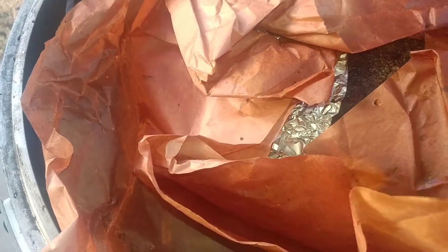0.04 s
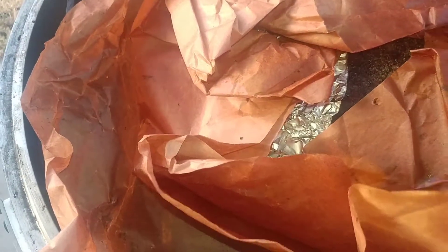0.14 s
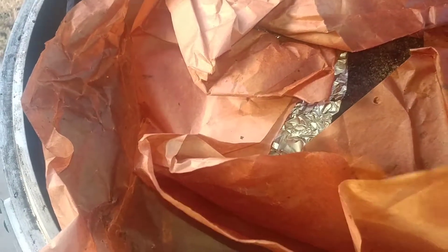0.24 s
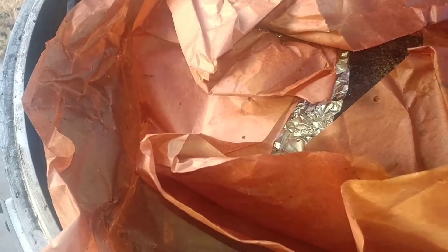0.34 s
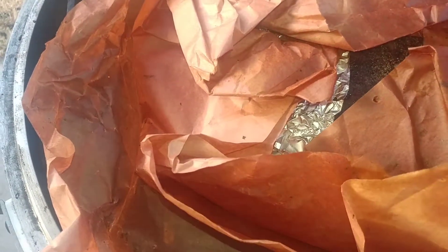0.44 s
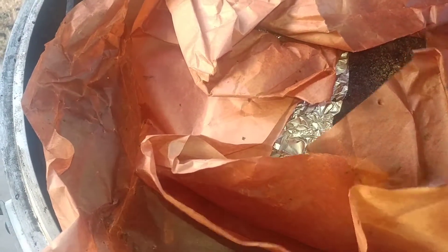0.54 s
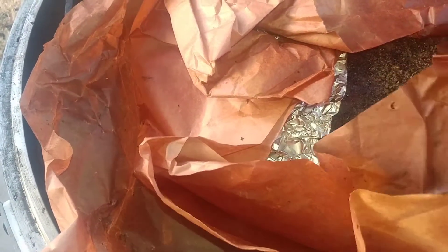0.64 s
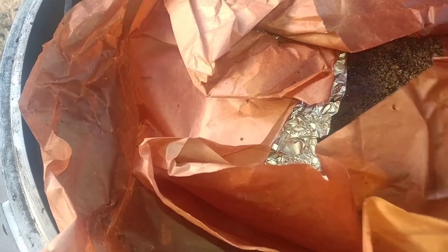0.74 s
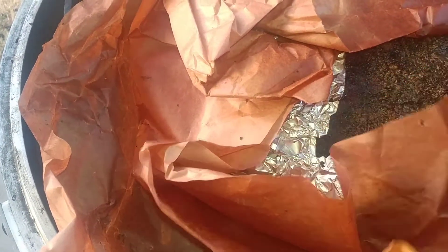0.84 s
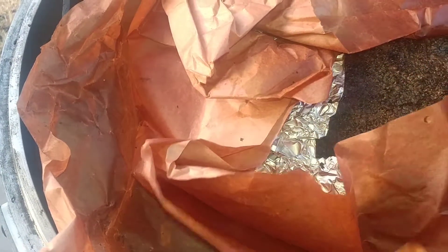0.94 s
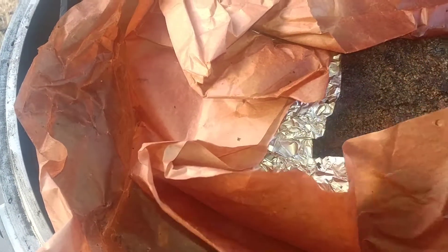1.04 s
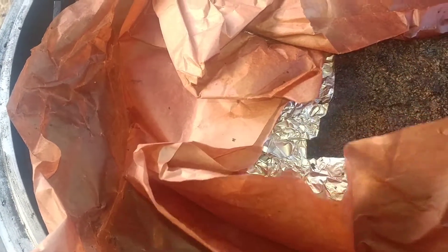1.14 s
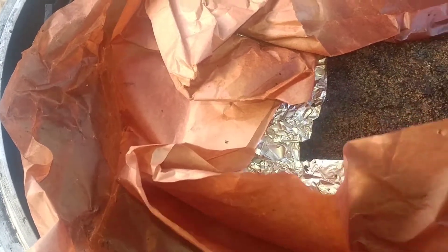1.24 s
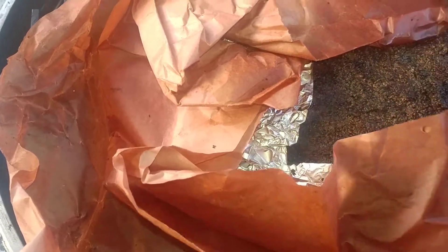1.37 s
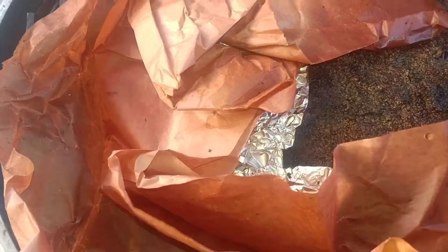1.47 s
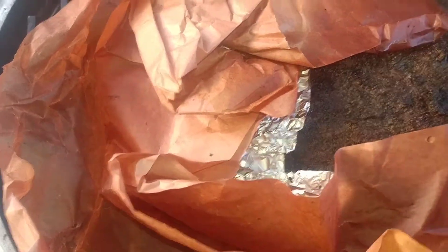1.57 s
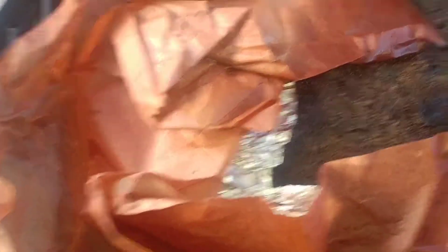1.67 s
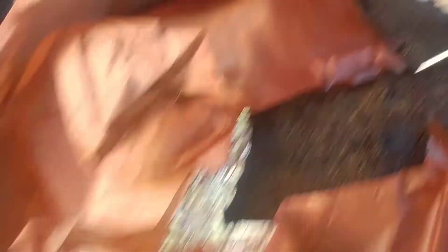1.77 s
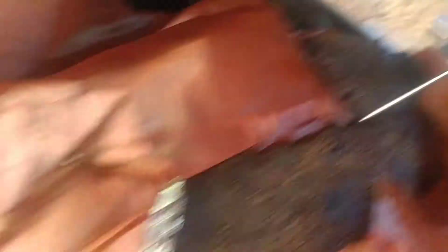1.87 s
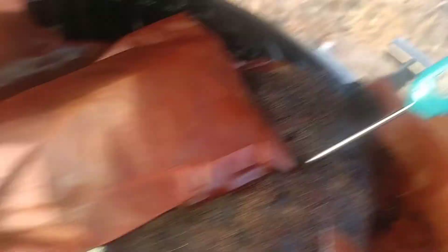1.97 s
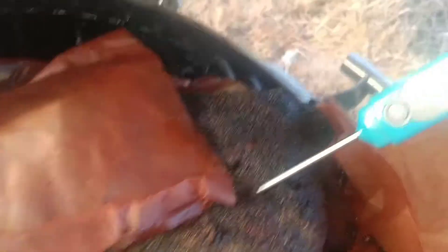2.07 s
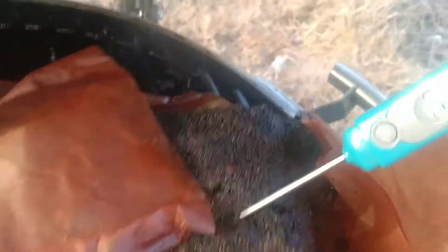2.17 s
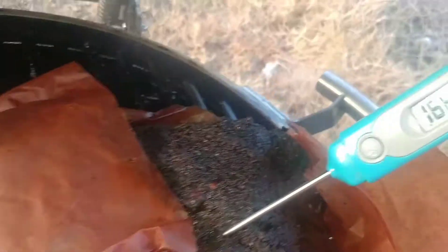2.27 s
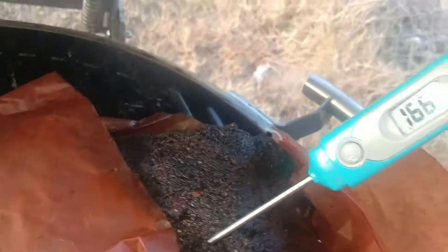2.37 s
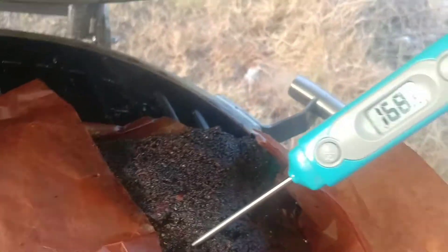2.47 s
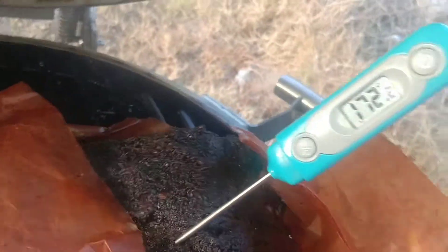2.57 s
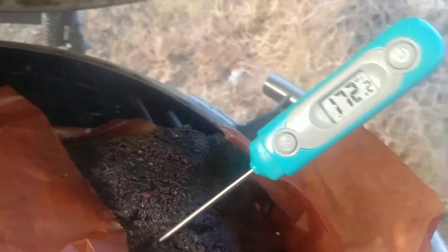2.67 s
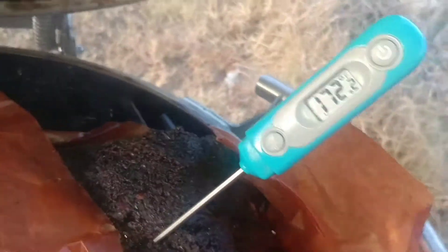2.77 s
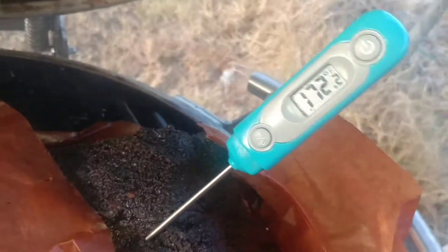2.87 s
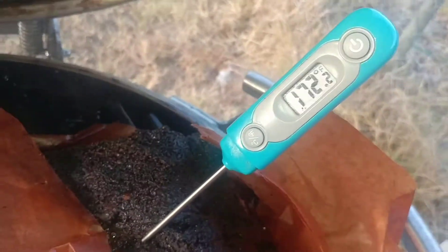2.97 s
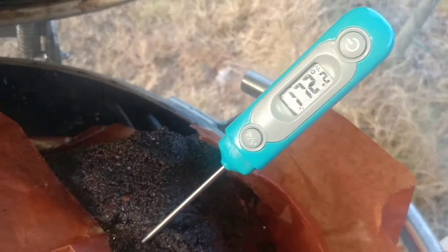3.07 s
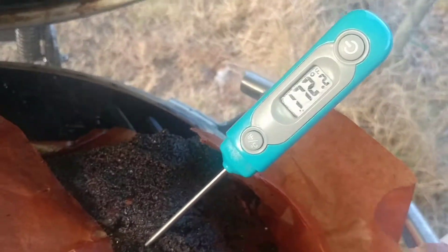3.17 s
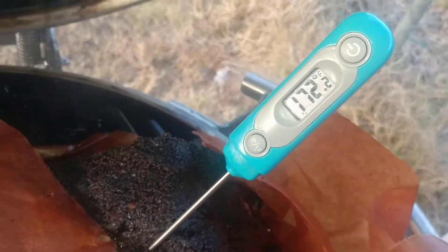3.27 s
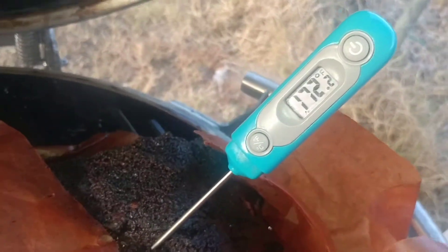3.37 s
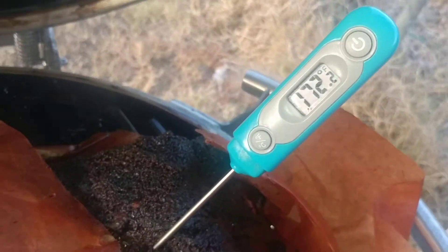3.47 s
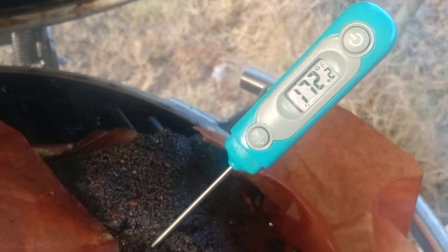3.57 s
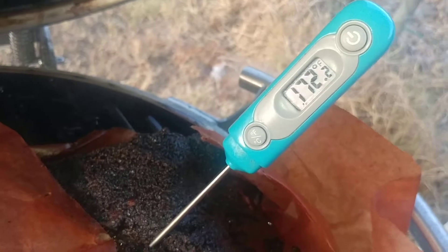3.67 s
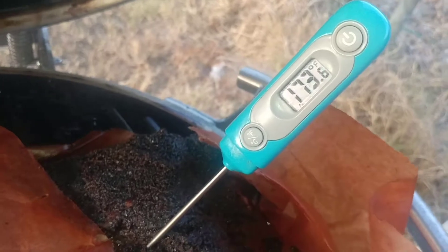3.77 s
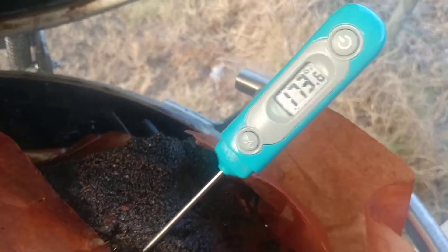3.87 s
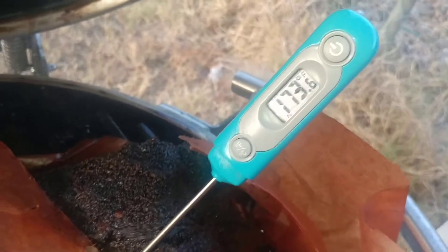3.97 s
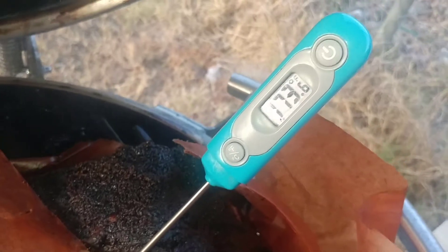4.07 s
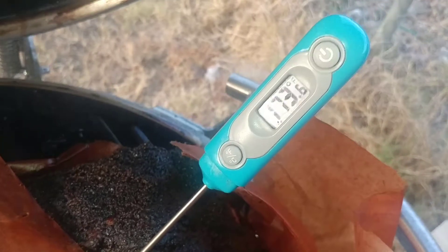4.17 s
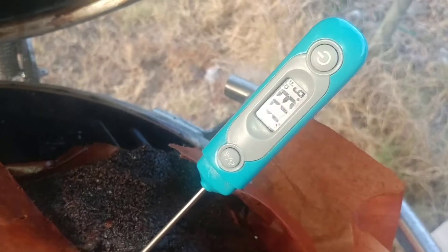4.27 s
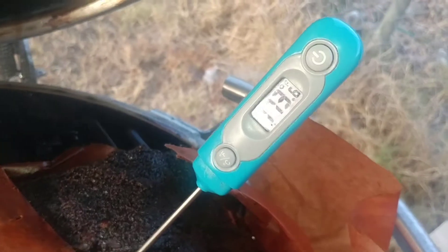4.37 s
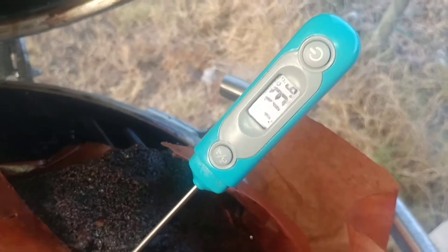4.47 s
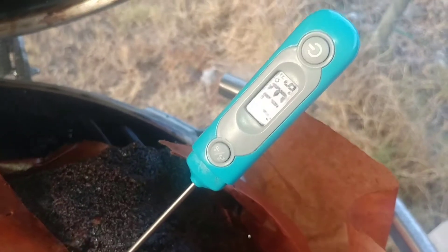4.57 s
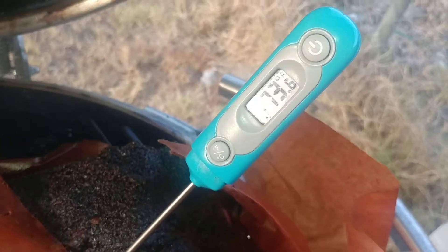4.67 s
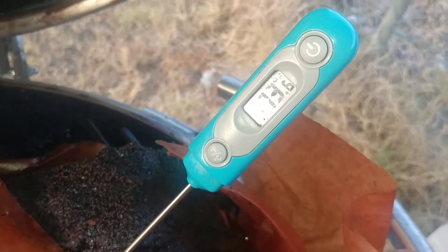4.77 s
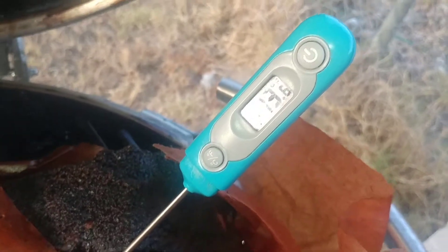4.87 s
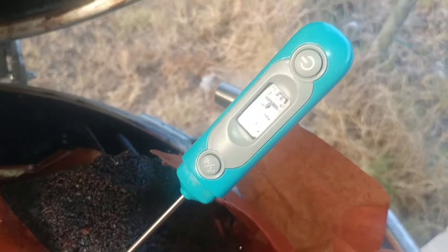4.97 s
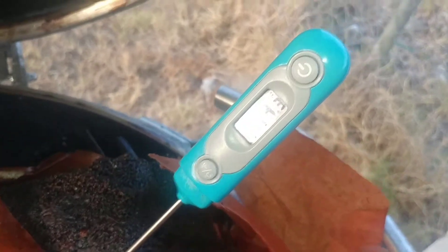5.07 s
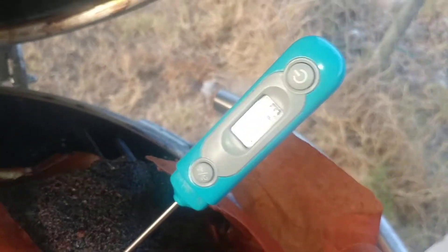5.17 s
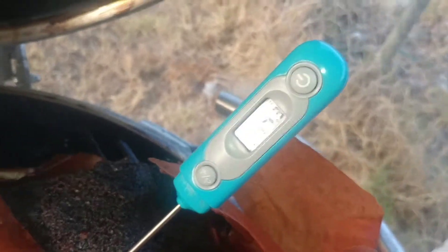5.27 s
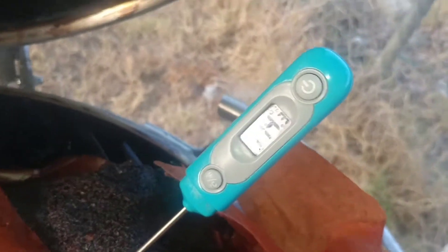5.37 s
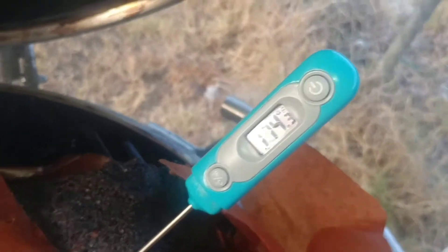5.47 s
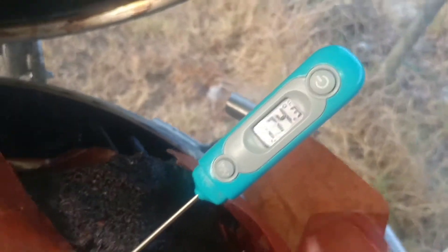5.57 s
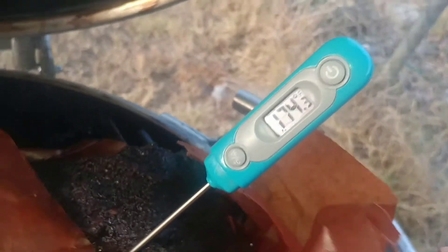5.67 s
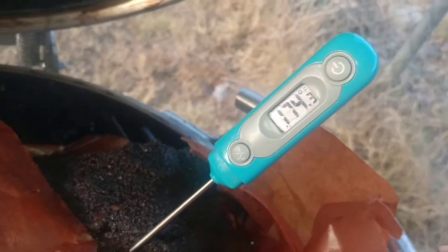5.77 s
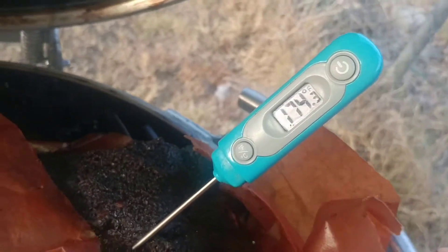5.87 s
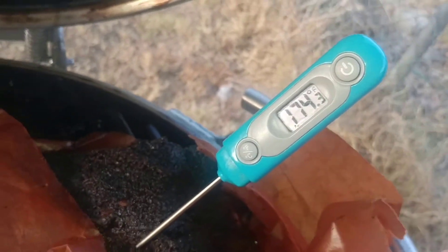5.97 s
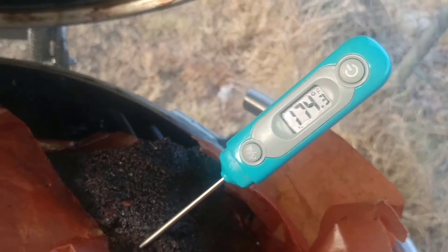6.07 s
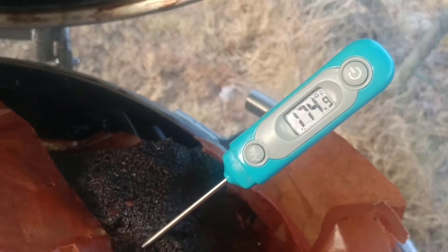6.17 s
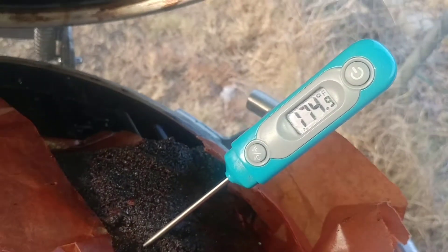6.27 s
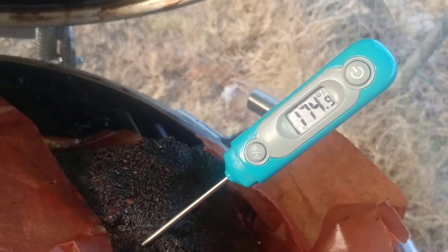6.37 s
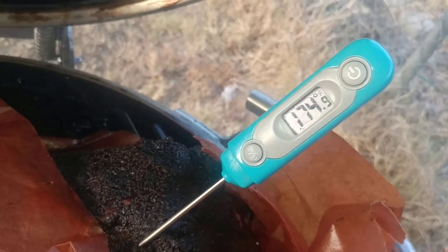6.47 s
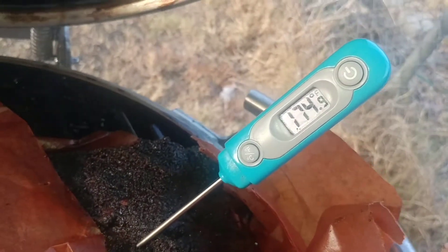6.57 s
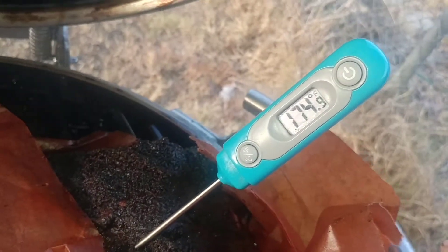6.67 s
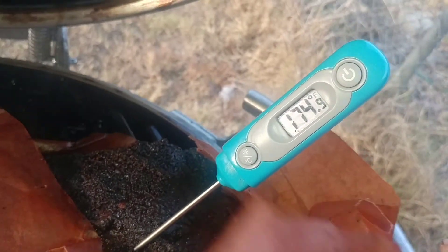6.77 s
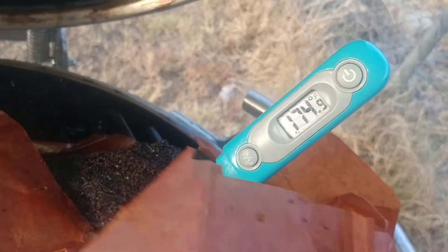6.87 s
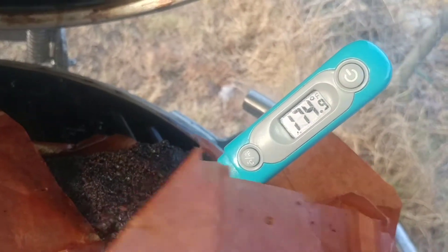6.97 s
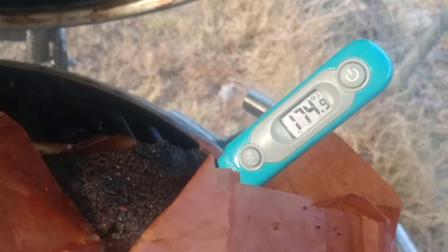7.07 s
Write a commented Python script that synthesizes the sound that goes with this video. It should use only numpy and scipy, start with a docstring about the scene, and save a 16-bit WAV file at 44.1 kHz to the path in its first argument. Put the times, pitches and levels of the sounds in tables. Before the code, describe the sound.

Stiff butcher paper is pulled open close by, crinkling and snapping hard, then settling into sparse scuffs, soft pops and small crackles outdoors.

```python
"""Outdoors at a kettle grill, with a phone held close: stiff butcher paper is pulled open around a roast.
The sheet slides and crinkles (grains of noise and short tones, coloured and shaped by the effort of the hand).
Creases snap and ring the panels beside them (noise bursts and decaying modes), and whole flaps thump softly.
Scuffs, pops and narrow-band hums run throughout, mostly sparse after the first pulls, with one more pull near
the end. The grill bowl rings faintly; a low handling rumble comes and goes over still air (coloured noise)."""
import sys
import numpy as np
from scipy import signal
from scipy.fft import rfft, irfft
from scipy.io import wavfile
from scipy.ndimage import uniform_filter1d

SR = 44100
rng = np.random.default_rng(int(sys.argv[2]) if len(sys.argv) > 2 else 0)


def output_pcm(signal):
    """Save a mono or channel-first signal as 16-bit PCM at the path in sys.argv[1].

    Samples are clipped to [-1, 1] before scaling.
    """
    pcm = np.clip(np.atleast_2d(signal).T, -1, 1) * 32767
    wavfile.write(sys.argv[1], SR, np.round(pcm).astype(np.int16))


N = 314433
TIME = np.arange(N) / SR

# Long pulls on the paper: (time [s], length [s], rustle level [dB], level of the rubbing fibres' hiss [dB])
LONG_PULLS = [(0.854, 0.047, -35.5, -42.5), (0.9, 0.14, -44, -46), (1.108, 0.19, -41, -48),
              (1.323, 0.074, -45, -47), (1.392, 0.1, -41.5, -44.5), (6.783, 0.15, -46.5, -53.5)]
PULL_ATTACK_S, PULL_RELEASE_T60_S = 0.035, 0.19
# Creep of the handled paper underneath, before its waver: (time [s], rustle level [dB])
CREEP_LEVEL = [(0.0, -50), (0.25, -55), (0.38, -61.5), (0.62, -51.5), (1.4, -43), (1.6, -66.5),
               (2.05, -67.5), (3.4, -70), (3.9, -73.5), (4.7, -70), (6.0, -84.5), (6.42, -93.5),
               (6.72, -74), (7.1, -71)]
CREEP_HISS_DB, CREEP_WAVER_DB, CREEP_WAVER_PER_S = -6.5, 2.17, 38
# Short scuffs of paper on paper: (time [s], length [s], rustle level [dB], hiss level [dB], panel pitch [Hz])
SHORT_SCUFFS = [(0.18, 0.074, -51, -67, 1300), (0.269, 0.1, -52, -72, 1090),
                (0.384, 0.069, -58.5, -73, 2900), (0.447, 0.052, -55, -67, 2620),
                (0.517, 0.062, -49, -53, 2550), (0.599, 0.07, -48.5, -50.5, 2600),
                (0.777, 0.055, -46, -57, 2600), (0.981, 0.016, -46, -60, 1500),
                (1.755, 0.21, -57, -61, 1230), (2.098, 0.068, -64.5, -77, 1520),
                (2.316, 0.076, -58.5, -67, 890), (2.682, 0.063, -76, -55, 1200),
                (2.953, 0.076, -61, -80, 1550), (3.2, 0.21, -63.5, -80, 1620),
                (3.311, 0.056, -47.5, -70, 1090), (3.477, 0.14, -57.5, -60.5, 1860),
                (3.659, 0.038, -64.5, -74, 1410), (4.064, 0.087, -57.5, -59.5, 2960),
                (4.189, 0.062, -55, -51.5, 1400), (4.317, 0.037, -74, -64, 1790),
                (4.39, 0.044, -60, -60, 1800), (4.629, 0.081, -58.5, -61, 1900),
                (4.705, 0.075, -58.5, -58.5, 750), (4.838, 0.081, -70, -65, 2600),
                (4.964, 0.059, -64.5, -63, 3220), (5.145, 0.073, -59, -55, 2520),
                (5.416, 0.16, -69.5, -66, 1720), (6.776, 0.041, -45.5, -52, 1580),
                (6.974, 0.048, -67, -72, 860)]
SCUFF_HUM_DB, SCUFF_HUM_Q = -5, 11
# Gentle pulls only rub; hard ones break into separate crackles: rustle levels where these begin and take over
CRACKLE_FROM_DB, CRACKLE_FULL_DB = -45, -39
# Ringing panels change as the sheet bends: their range, sharpness, swing and changes per second
FLEX_LOW_HZ, FLEX_HIGH_HZ, FLEX_Q, FLEX_DB, FLEX_PER_S = 600, 4980, 6, 2.5, 45
# Whole sheet shaking: its level at a given rustle level, and its growth in dB per dB of rustle
SHEET_DB, SHEET_AT_RUSTLE_DB, SHEET_GROWTH = -59.5, -54.5, 0.58
# Spectrum of the crinkling rustle: (frequency [Hz], level [dB])
RUSTLE_SPECTRUM = [(150, -37), (280, -6.5), (405, 3), (520, 1), (680, -6.5), (1000, 1.5), (1350, -0.5),
                   (1750, 2), (2800, -1.5), (4000, -5.5), (5700, -8), (7500, -21)]
# Spectrum of the rubbing hiss: (frequency [Hz], level [dB])
HISS_SPECTRUM = [(3000, -35), (5500, 4.5), (8000, -1), (11000, 6), (13000, 9), (16000, -2)]
# Spectrum of the whole sheet shaking: (frequency [Hz], level [dB])
SHEET_SPECTRUM = [(60, -33.5), (110, -3), (142, -1), (185, -1), (270, -10.5), (400, -10), (520, -17),
                  (750, -47)]

# Creases snapping through: (time [s], relative level [dB], dull body [dB], panel ring [dB], sharp crack [dB],
# crack brightness at 12 kHz [dB], panel pitch [Hz], decay t60 [s]); body, ring and crack relative to the flutter
CREASE_SNAPS = [(0.08, -41.5, -14, -9, -6.5, -13, 2310, 0.059),
                (0.6641, -26.5, -13, -21, -5.5, 0.5, 2150, 0.055),
                (0.872, -36, -19, -10, -9, 0, 2800, 0.15), (0.901, -36, -5, -7, -3, -3.5, 2700, 0.037),
                (1.0197, -24, -8.5, -8, -2.5, -14, 2050, 0.04),
                (1.0343, -24, -7.5, -3.5, -14.5, -15, 1050, 0.063),
                (1.0655, -32.5, -10, -14.5, -10, -8, 1180, 0.022),
                (1.074, -33, -23, -1, -5.5, -7.5, 2900, 0.027),
                (1.113, -23, -8.5, -15, 0.5, -2, 2000, 0.04), (1.1438, -27, -10, -17, -4, -22, 1245, 0.081),
                (1.168, -32.5, -6, -10, -10, -1, 1460, 0.021), (1.183, -33.5, -12, -8, 1, 5.5, 3100, 0.063),
                (1.205, -35.5, -4, -8, 1, -9, 1490, .025), (1.2176, -34.5, -8, -10, -0.5, -6, 2720, 0.025),
                (1.241, -30, -7, -14, -4.5, 8, 3500, 0.12), (1.2725, -28.5, -7, -13, -19, 5.5, 1260, 0.032),
                (1.2855, -29, -11, -1, 1.5, -2.5, 1690, 0.048),
                (1.3912, -33.5, -6, -16, -5.5, -13, 1450, 0.017),
                (1.4219, -29.5, -32, -3, -4.5, -24, 1095, 0.041),
                (1.5, -33.5, -17.5, 5, -22, -2, 1367, 0.049),
                (1.7403, -32, -11.5, -12.5, -20.5, -4.5, 2080, 0.027),
                (1.7808, -36, -20, -7.5, -12.5, -7.5, 2980, 0.028),
                (1.8212, -25, -9, -3.5, -12, -1, 1380, 0.044),
                (2.6803, -28, -2.5, -3.5, -0.5, -13, 3460, 0.035),
                (2.688, -29, -6, -8.5, -20.5, -6, 730, 0.056),
                (2.7655, -24.5, -4.5, -12, -3, -1, 2330, 0.032),
                (2.961, -37.5, -3, -1, -12.5, -0.5, 1760, 0.075),
                (3.518, -37, -10, -7, -7.5, 5.5, 2040, 0.042), (3.533, -39, -12, -1, -8, 1, 2070, 0.052),
                (4.088, -49.5, -8, -9, -1.5, 7.5, 1520, 0.094),
                (4.3212, -46.5, -12, -3, -3.5, -4, 1800, 0.055),
                (5.1238, -41.5, -6, 8, -20, 3, 2860, 0.086),
                (5.1526, -35.5, -6, -13, -10.5, -8, 2430, 0.023),
                (5.566, -37.5, -4, -4, -15, -4, 1690, 0.058), (5.59, -43.5, -14, -4, -18, 4, 830, .044),
                (6.4812, -29, -5.5, -16.5, -12.5, -21, 1530, 0.052),
                (6.7986, -30, -23, -19, -10.5, -1, 1920, 0.016)]
# Softer, duller paper snaps with hardly any crack:
# (time [s], relative level [dB], panel ring relative to the flutter [dB], panel pitch [Hz])
SOFT_SNAPS = [(0.17, -45.5, -10, 1250), (0.582, -44, -1, 1060), (2.131, -46, -3, 1390),
              (2.357, -46, 9, 840), (2.485, -61, -12, 2500), (2.617, -51.5, 25, 1034),
              (2.937, -41, 2, 1630), (2.994, -52, 8, 1680), (3.008, -53, 17, 620),
              (3.034, -54.5, -10, 1600), (3.168, -52.5, -2, 2330), (3.231, -49, -8, 1204),
              (3.316, -47, 0, 3330), (3.344, -42, 4, 820), (3.372, -45.5, 5, 1044), (3.4253, -47, 5, 986),
              (3.493, -46, -5, 2080), (3.779, -57.5, -12, 1070), (4.021, -59, 0, 883),
              (4.191, -51.5, 4, 980), (4.214, -49.5, 2, 1400), (4.391, -63, 2, 1500),
              (4.538, -61.5, 7, 1500), (4.612, -53, -15, 1350), (4.659, -48.5, -4, 1750),
              (4.672, -52, 2, 1090), (4.841, -62, 1, 1910), (5.102, -53, -3.5, 800),
              (5.46, -53.5, -14, 1500), (5.486, -56.5, -2, 1900), (5.604, -50, -5, 1266),
              (5.847, -54.5, -7, 1100), (6.836, -39.5, 7.5, 890), (6.858, -42.5, -7, 1200),
              (6.941, -49.5, 3, 894), (7.002, -53.5, 11, 874)]
SOFT_BODY_DB, SOFT_CRACK_DB, SOFT_BRIGHT_DB, SOFT_T60_S = -1.5, -26.5, -2.5, 0.037
# Spectrum of the dull body of a blow: (frequency [Hz], level [dB])
BODY_SPECTRUM = [(100, -12.5), (200, -6), (320, -19), (410, -11), (510, -1), (640, -4.5), (850, -2.5),
                 (1300, -25), (3000, -72)]
# Spectrum of the flutter of bending waves: (frequency [Hz], level [dB])
FLUTTER_SPECTRUM = [(400, -12.5), (900, -1.5), (1350, 4.5), (2000, 1.5), (2900, 1.5), (4200, -9),
                    (6000, -22), (12000, -49)]
# Spectrum of the sharp crack: (frequency [Hz], level [dB])
CRACK_SPECTRUM = [(2000, -40.5), (4500, 4), (5700, 5.5), (7000, -0.5), (9500, -0.5), (13000, 6),
                  (16000, -7)]
# Modes of a panel between creases: (multiple of its pitch [ratio], level [dB])
PANEL_MODES = [(.64, -20.5), (.87, -10.5), (0.998, 5.5), (1.181, -9.5)]
# A strong crease gives way at once, a weak one crumples: attack at a reference level, and dB weaker to double it
SNAP_ATTACK_S, SNAP_REF_DB, ATTACK_DOUBLING_DB = 0.0015, -29.5, 13.5
# The panels that ring most lie further left: left minus right in dB, and its dB per dB of ring
SNAP_PAN_DB, SNAP_PAN_PER_RING = 2, 0.13
# Broad panels that flip over: (time [s], modes as a list of (frequency [Hz], level [dB], decay t60 [s]))
BROAD_FLIPS = [(2.766, [(753, -29.5, 0.025), (1230, -37, 0.076), (1786, -28, 0.095), (2030, -10, 0.0097),
               (2940, -26, 0.018), (3450, -44, 0.058)]), (6.4812, [(501, -39.5, 0.14), (605, -29, 0.039),
               (745, -32.5, 0.047), (852, -44, 0.088), (1360, -26.5, 0.046), (1577, -29, .045)]),
               (6.799, [(2070, -28, 0.032), (2770, -21, 0.016), (3520, -30.5, .03), (3800, -30, .025),
               (4270, -28.5, 0.03)])]
BROAD_ATTACK_S, BROAD_PAN_DB = 0.00085, 5.5

# Flaps of the sheet swinging: (time [s], relative level [dB], starting pitch [Hz])
FLAP_SWINGS = [(0.896, -33, 145), (1.035, -35.5, 178), (1.149, -24.5, 170), (1.255, -34, 169),
               (2.701, -25, 144.2), (2.724, -33.5, 150), (2.973, -34.5, 140), (3.554, -40, 120),
               (5.135, -40, 153), (5.57, -44.5, 142.2), (6.843, -33, 153)]
# Modes of a loose flap: (multiple of its pitch [ratio], level [dB])
LOOSE_FLAP_MODES = [(1, 0.5), (2.249, -17.5), (2.65, -12)]
# Narrow-band hums of the paper, low in the pulls and higher in creaks:
# (time [s], length [s], level [dB], pitch [Hz], filter width [Hz])
PAPER_HUMS = [(0.859, 0.068, -51.5, 413, 250), (1.132, 0.14, -41, 418.3, 200),
              (1.8, 0.022, -48.5, 420, 300), (1.55, 0.12, -70, 1930, 220), (1.555, 0.12, -67.5, 3000, 500),
              (1.699, 0.034, -57.5, 2930, 400), (3.138, 0.054, -57.5, 1590, 900),
              (3.26, 0.054, -56, 1680, 500), (5.121, 0.031, -40, 3060, 1170),
              (6.626, 0.05, -68.5, 1470, 975), (6.709, 0.021, -65.5, 1730, 1500)]
# Hollow of the grill bowl under the paper: (frequency [Hz], relative level [dB], decay t60 [s])
BOWL_MODES = [(373, 4, 0.025), (523, -0.5, 0.1), (759.4, -2.5, 0.15), (892, 0.5, 0.032), (1050, -8, 0.033),
              (1436, 4.5, 0.018), (1767, -3.5, 0.084), (2930, -11.5, 0.056)]

# Low handling rumble near 68 Hz that comes and goes: (time [s], level [dB])
RUMBLE_LEVEL = [(0.0, -63.5), (1.2, -58.5), (3.55, -63.5), (3.85, -75), (5.65, -60.5), (5.85, -83.5),
                (6.38, -82), (6.47, -61.5), (7.13, -60.5)]
# Spectrum of the still air: (frequency [Hz], level [dB])
AIR_SPECTRUM = [(12, -48.5), (20, -27), (43, -16), (52, -0.5), (74, 3), (96, -8.5), (138, -2), (163, -21.5),
                (357, -15), (1570, -33), (1850, -29.5), (2300, -37), (4670, -37.5), (7110, -35),
                (8410, -37.5), (14300, -30), (16000, -48)]
AIR_DB = -66

# The phone swings to the right, so the paper comes to lie further left (left minus right in dB)
TURN_START_S, TURN_END_S, TURN_PAN_DB = 1.43, 2.5, 4
# As it turns, the left port hears the paper less and less late: (time [s], lag [s])
LEFT_PORT_LAG = [(1.35, 0.00024), (1.8, .00012), (5.1, 0.000037)]
TOP_HZ = 15800  # upper limit of the microphone


def sliding():
    """Paper drags over paper and crust in jerks: it crinkles, hisses and shakes the whole sheet."""
    gains = effort()
    jerks = undb(0.72 * walk(50))
    smooth = ports(rng.standard_normal((2, N)))
    bending = ports(rng.standard_normal((2, N)))
    fine = ports(crinkle(per_s=900, spread_db=3.0, smear_t60=0.017, ring_db=-3, smooth_db=-2.0))
    coarse = ports(crinkle(per_s=200, spread_db=9.0, smear_t60=0.034, ring_db=0.0, smooth_db=-5.5))

    # harder effort moves from fine rubbing to coarse crackles
    hardness = (20 * np.log10(gains[0]) - CRACKLE_FROM_DB) / (CRACKLE_FULL_DB - CRACKLE_FROM_DB)
    share = np.clip(hardness, 0, 1)
    grains = flexing(np.sqrt(1 - share) * fine + np.sqrt(share) * coarse)
    humming = scuffs(gains, grains)

    rustle_gain, hiss_gain = gains * jerks
    # the whole sheet shakes with the rustle, but grows more slowly
    sheet_gain = undb(SHEET_DB) * (rustle_gain / undb(SHEET_AT_RUSTLE_DB)) ** SHEET_GROWTH
    rustle = rustle_gain * unit(colour(grains, RUSTLE_SPECTRUM)) + humming
    hiss = undb(1.5) * hiss_gain * unit(colour(grains + undb(-4.0) * smooth, HISS_SPECTRUM))
    sheet = sheet_gain * unit(colour(bending, SHEET_SPECTRUM))
    return rustle * sides(0.56) + hiss * sides(-0.59) + sheet * sides(1.3)


def effort():
    """Gains of rustle and hiss: each pull grips, holds and lets go, over the wavering creep of the paper."""
    creep_db = np.interp(TIME, *np.transpose(CREEP_LEVEL)) + CREEP_WAVER_DB * walk(CREEP_WAVER_PER_S)
    gains = undb([creep_db, creep_db + CREEP_HISS_DB])
    for s, length, db, hiss_db in LONG_PULLS:
        grip = np.clip((TIME - s) / PULL_ATTACK_S, 0, 1)
        release = fade(np.maximum(TIME - s - length, 0), PULL_RELEASE_T60_S)
        gains = np.maximum(gains, undb([[db], [hiss_db]]) * grip * release)
    return gains


def scuffs(gains, grains):
    """A scuff catches quickly and dies away more slowly: raise the gains in place, return the panels' hum."""
    humming = np.zeros((2, N))
    for s, length, db, hiss_db, hz in SHORT_SCUFFS:
        progress = np.linspace(0, 1, int(max(length, .01) * SR), endpoint=False)
        push = np.sin(np.pi * progress ** .7)
        add(gains, s, undb([[db], [hiss_db]]) * push)
        under_scuff = grains[:, int(s * SR):][:, :len(push)]
        hum = signal.lfilter(*signal.iirpeak(hz, SCUFF_HUM_Q, fs=SR), under_scuff)
        add(humming, s, undb(db + SCUFF_HUM_DB) * push * unit(hum))
    return humming


def crinkle(per_s, spread_db, smear_t60, ring_db, smooth_db, count=40, size=1024):
    """Tiny slips of very uneven size on many patches of the sheet, each with its own pitch, over smooth rubbing."""
    out, t = np.zeros((2, N)), np.arange(size) / SR
    hz = np.geomspace(400, 4400, count)[:, None, None]
    rings = np.sin(2 * np.pi * hz * t + rng.uniform(0, 2 * np.pi, (count, 2, 1)))
    noise = rng.standard_normal((count, 2, size))
    patches = (noise + undb(ring_db) * rings) * fade(t, smear_t60)
    rubbing = rng.standard_normal((2, N))
    for when, where, strength in rng.random((int(per_s * N / SR), 3)):
        # many small slips, few large ones
        size_db = spread_db * min(-np.log(1 - strength), 3)
        add(out, when * N / SR, undb(size_db) * patches[int(where * count)])
    return unit(unit(out) + undb(smooth_db) * rubbing)


def flexing(x, count=9):
    """As the sheet bends, its panels take turns to ring: narrow resonances swell and sink on their own."""
    out = x
    for hz in np.geomspace(FLEX_LOW_HZ, FLEX_HIGH_HZ, count):
        band = signal.lfilter(*signal.iirpeak(hz, FLEX_Q, fs=SR), x)
        out = out + band * (undb(FLEX_DB * walk(FLEX_PER_S)) - 1)
    return unit(out)


def snaps():
    """Creases snap through; softer snaps are duller, with hardly any crack."""
    out = np.zeros((2, N))
    for s, *crease in CREASE_SNAPS:
        add(out, s, buckle(*crease))
    for s, db, ring_db, hz in SOFT_SNAPS:
        add(out, s, buckle(db, SOFT_BODY_DB, ring_db, SOFT_CRACK_DB, SOFT_BRIGHT_DB, hz, SOFT_T60_S))
    return out


def buckle(db, body_db, ring_db, crack_db, bright_db, hz, t60, size=6144):
    """One blow in the paper: a sharp crack, a flutter of bending waves, a duller body and the next panel's ring."""
    t = np.arange(size) / SR
    pan_db = SNAP_PAN_DB + SNAP_PAN_PER_RING * ring_db
    # the blow starts at half strength and swells to full
    attack = SNAP_ATTACK_S * 2 ** ((SNAP_REF_DB - db) / ATTACK_DOUBLING_DB)
    rise = 2.0 - np.exp(-(t / attack) ** 2)
    # the first spike reaches both ports alike, a little apart in time
    spike = rng.standard_normal(size)
    spike = np.array([np.roll(spike, int(rng.normal(0, 2.2))), spike]) * fade(t, 0.0069)
    # then waves die away in the sheet and scatter from the grill around it
    waves = ports(rng.standard_normal((2, size)))
    dying = fade(t, t60) + undb(-15) * fade(t, 0.14)
    burst = rise * (undb(4.5) * spike + waves * dying)

    # the size of the panel decides where the flutter is strongest
    panel_size = [(hz / 2, -6), (hz, 0), (hz * 2, -6)]
    flutter = blow(colour(colour(burst, FLUTTER_SPECTRUM, size=1024), panel_size))
    body = blow(colour(waves * rise * fade(t, 2.12 * t60), BODY_SPECTRUM))
    crack = blow(colour(burst, CRACK_SPECTRUM, size=1024))
    crack = colour(crack, [(6000, 0), (12000, bright_db)], size=1024)
    modes = sum(undb(mode_db) * ringing(hz * multiple, t) for multiple, mode_db in PANEL_MODES)
    panel = blow(modes * rise * fade(t, t60))

    voice = blow(flutter + undb(ring_db) * panel) * sides(pan_db)
    return undb(db - 4.0) * (voice + undb(body_db) * body * sides(pan_db / 2) + undb(crack_db) * crack)


def ringing(hz, t):
    """One steady mode of a panel, a little out of step at the two ports."""
    return np.sin(2 * np.pi * hz * t + rng.uniform(0, 2 * np.pi) + rng.normal(0, 0.36, (2, 1)))


def broad_panels(size=6144):
    """A hard snap flips a whole panel, which pops with a hollow pitch as its own modes decay."""
    out, t = np.zeros((2, N)), np.arange(size) / SR
    for s, modes in BROAD_FLIPS:
        ring = sum(undb(db) * ringing(hz, t) * fade(t, t60) for hz, db, t60 in modes)
        add(out, s, ring * (1 - np.exp(-t / BROAD_ATTACK_S)) * sides(BROAD_PAN_DB))
    return out


def flaps(size=8192):
    """A loose flap swings a few times and pushes air; its pitch sags as it slackens."""
    out, t = np.zeros((2, N)), np.arange(size) / SR
    envelope = fade(t, 0.06) * (1 - np.exp(-t / 0.005))
    for s, db, hz in FLAP_SWINGS:
        turn = 2 * np.pi * hz * (t - 0.21 * t ** 2)
        swing = np.zeros(size)
        for multiple, mode_db in LOOSE_FLAP_MODES:
            swing += undb(mode_db) * np.sin(multiple * turn + rng.uniform(0, 2 * np.pi))
        add(out, s, undb(db + 4.5) * swing * envelope * sides(1.0))
    return out


def paper_hums():
    """Rubbing noise rings through a narrow resonance: low hums in the pulls, higher creaks elsewhere."""
    out, rubbing = np.zeros((2, N)), ports(rng.standard_normal((2, N)))
    for s, length, db, hz, width_hz in PAPER_HUMS:
        push = signal.windows.tukey(int(max(length, .01) * SR), .5)
        resonance = signal.iirpeak(hz, hz / width_hz, fs=SR)
        tone = rubbing[:, int(s * SR):][:, :len(push)]
        tone = signal.lfilter(*resonance, signal.lfilter(*resonance, tone))
        add(out, s, undb(db) * push * unit(tone))
    return out


def bowl(paper, size=8192):
    """The hollow of the grill rings faintly after every sound of the paper, as a sum of decaying modes."""
    t = np.arange(size) / SR
    response = np.zeros(size)
    for hz, db, t60 in BOWL_MODES:
        response += undb(db) * energy_one(np.sin(2 * np.pi * hz * t) * fade(t, t60))
    return undb(-30.0) * signal.fftconvolve(paper, response[None], axes=1)[:, :N]


def handling_rumble():
    """Low noise in a hump near 68 Hz, whose level drops and returns with the handling."""
    low_hump = [(30, -36.5), (52, -8.0), (68, 0), (85, -6.5), (160, -31.0), (500, -64.5)]
    rumble = unit(colour(ports(rng.standard_normal((2, N))), low_hump))
    return rumble * undb(np.interp(TIME, *np.transpose(RUMBLE_LEVEL)))


def still_air():
    """Faint coloured noise of the open air, its level wavering a little."""
    air = unit(colour(ports(rng.standard_normal((2, N))), AIR_SPECTRUM))
    return air * undb(AIR_DB + 0.88 * walk(15.0))


def undb(db):
    """Decibels to gain."""
    return 10 ** (np.asarray(db) / 20)


def unit(x):
    """Scale to rms 1."""
    return x / np.sqrt(np.mean(x ** 2))


def energy_one(x):
    """Scale each channel of a short sound to energy 1."""
    return x / np.sqrt(np.sum(x ** 2, axis=-1, keepdims=True))


def blow(x, size=512):
    """Scale a struck sound so that its first moments have rms 1."""
    return x / np.sqrt(np.mean(x[:, :size] ** 2))


def fade(t, t60):
    """Exponential decay, 60 dB down after t60 (at least 2 ms)."""
    return np.exp(-np.log(1000) * t / max(t60, .002))


def sides(pan_db):
    """Left and right gains for a level difference."""
    return undb(np.array([[pan_db], [-pan_db]]) / 2)


def add(out, s, sound):
    """Mix a short sound in at time s."""
    i = max(int(s * SR), 0)
    out[:, i:i + sound.shape[1]] += sound[:, :N - i]


def colour(x, points, size=4096):
    """Causal minimum-phase filter through (frequency [Hz], level [dB]) points."""
    hz, db = np.transpose(points)
    grid = np.maximum(np.fft.rfftfreq(size, 1 / SR), 1)
    cepstrum = irfft(np.log(undb(np.interp(np.log(grid), np.log(hz), db))))
    # folding the cepstrum puts the energy of the response first
    cepstrum[1:size // 2] *= 2
    cepstrum[size // 2 + 1:] = 0
    response = irfft(np.exp(rfft(cepstrum)))
    return signal.oaconvolve(x, response[None], axes=1)[:, :x.shape[1]]


def ports(x, split_hz=1000, bass_side=0.18, treble_side=0.91):
    """Two unrelated signals become left and right: long waves reach both ports nearly alike."""
    treble = signal.sosfilt(signal.butter(2, split_hz, "high", fs=SR, output="sos"), x[1])
    bass = signal.sosfilt(signal.butter(2, split_hz, fs=SR, output="sos"), x[1])
    side = treble_side * treble - bass_side * bass
    return np.array([x[0] + side, x[0] - side])


def walk(rate):
    """Slow smoothed chance with rms 1, redrawn at the given rate per second."""
    k = int(SR / rate)
    steps = np.repeat(rng.standard_normal(N // k + 1), k)
    return unit(uniform_filter1d(uniform_filter1d(steps, k), k)[:N])


def scene():
    """The paper close to the phone, the bowl under it, the handling rumble and the open air."""
    background = handling_rumble() + still_air()
    paper = sliding() + snaps() + broad_panels() + flaps() + paper_hums()
    # the turn shifts the middle of the spectrum; bass and hiss reach both ports as before
    middle = signal.sosfilt(signal.butter(1, [400, 3500], "band", fs=SR, output="sos"), paper)
    pan_db = np.interp(TIME, [TURN_START_S, TURN_END_S], [0, TURN_PAN_DB])
    paper = paper + middle * (undb(np.array([pan_db, -pan_db]) / 2) - 1)
    lag = np.interp(TIME, *np.transpose(LEFT_PORT_LAG))
    late = np.round((TIME - lag) * SR).astype(int)
    paper = np.array([paper[0].take(late, mode="clip"), paper[1]])
    return background + paper + bowl(paper)


def record(dry):
    """The microphone ports have a notch in the treble; the right one is brighter above it."""
    left = colour(dry[:1], [(9300, 0.0), (10500, -12.5), (11700, -4.0), (15000, -4.5)])
    right = colour(dry[1:], [(9300, 0.0), (10500, -24.5), (11700, -1.0), (15000, -0.5)])
    top = signal.ellip(8, .2, 70, TOP_HZ, fs=SR, output="sos")
    return signal.sosfilt(top, np.vstack([left, right]))


dry = scene()
out = record(dry)
output_pcm(out)
```